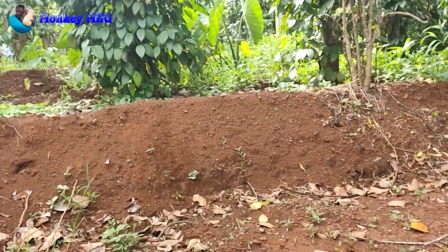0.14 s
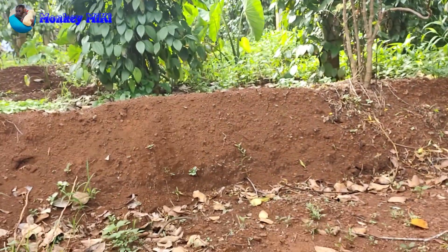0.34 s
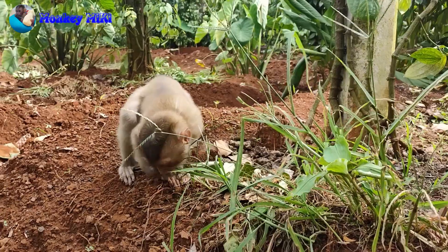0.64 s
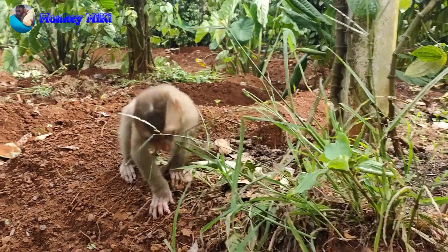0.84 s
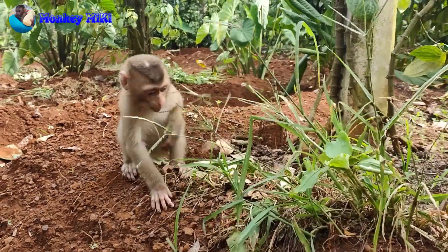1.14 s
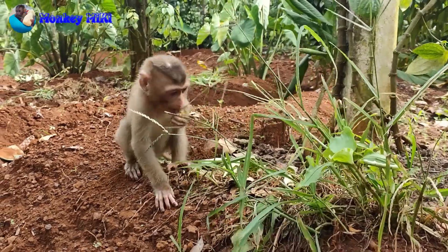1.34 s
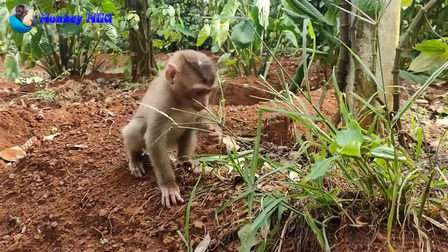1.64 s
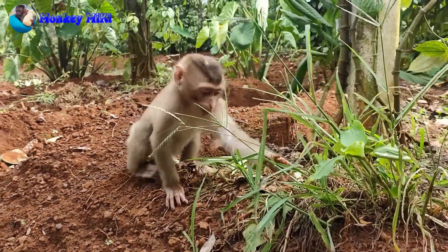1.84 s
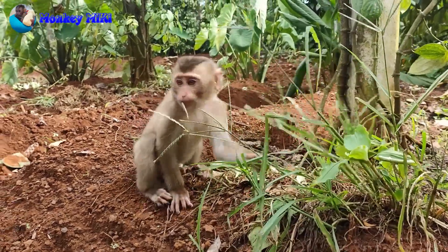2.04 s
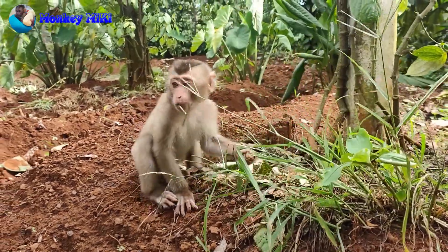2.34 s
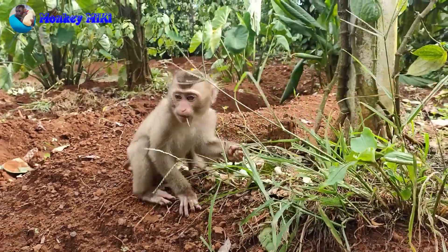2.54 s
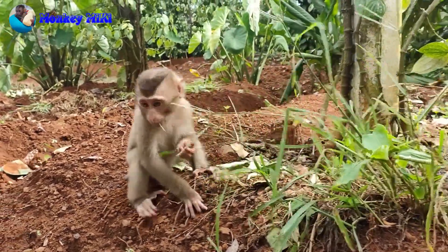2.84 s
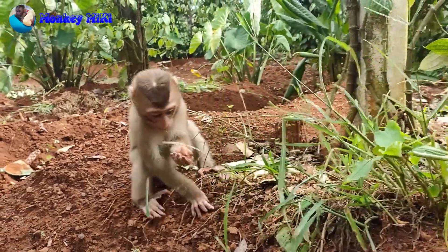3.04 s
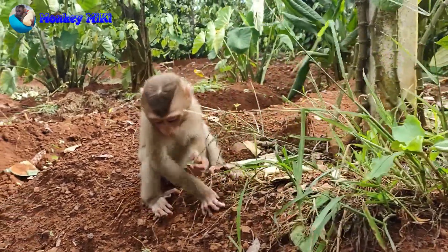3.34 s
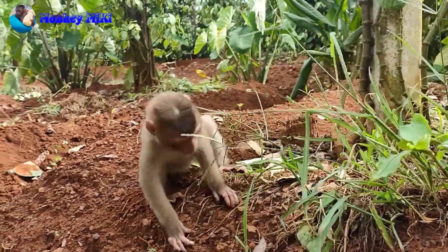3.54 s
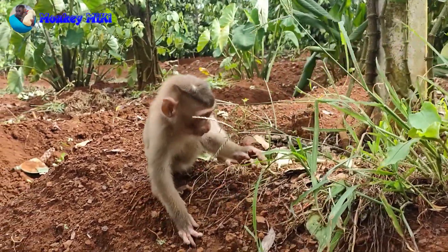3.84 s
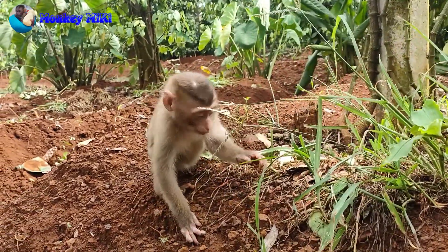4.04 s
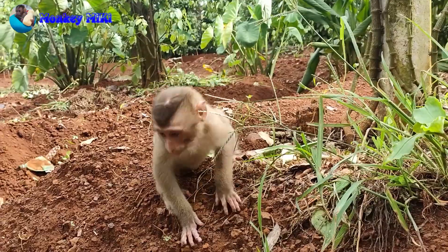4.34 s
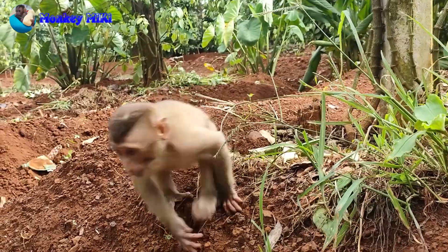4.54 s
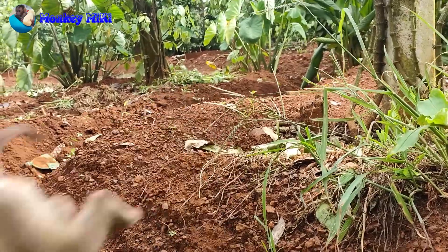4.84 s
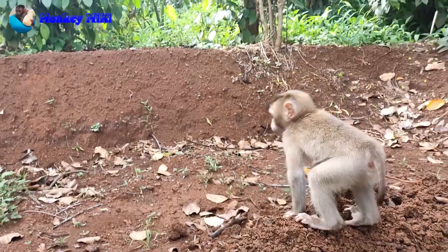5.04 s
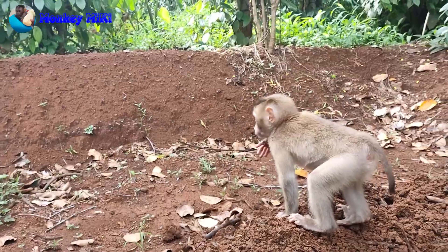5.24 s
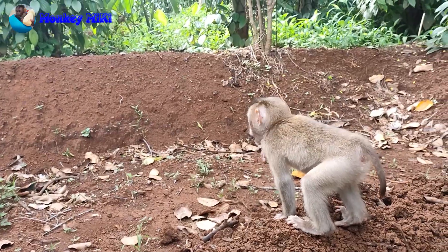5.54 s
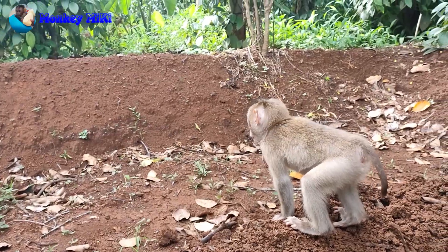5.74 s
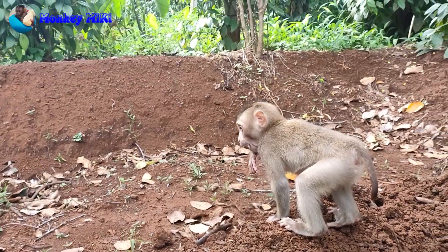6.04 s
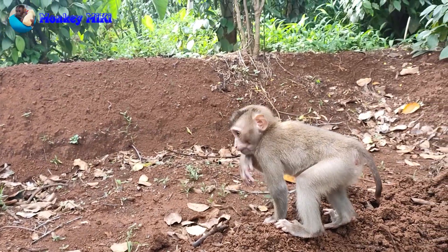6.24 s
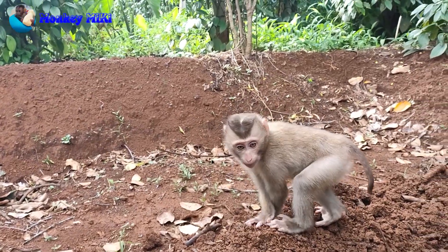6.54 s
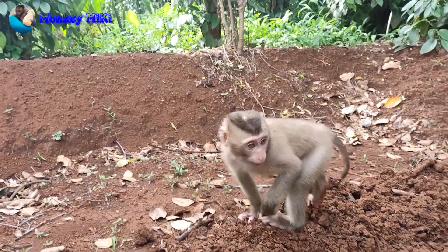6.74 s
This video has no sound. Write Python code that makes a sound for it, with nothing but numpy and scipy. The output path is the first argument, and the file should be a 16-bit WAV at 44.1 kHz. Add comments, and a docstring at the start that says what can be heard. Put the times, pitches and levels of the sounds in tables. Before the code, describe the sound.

Dry leaves rustle and loose soil crunches as a small animal scratches and digs outdoors, with sharp twig snaps over a faint low hum.

```python
"""Outdoors on loose soil: paws rustle dry leaves and snap twigs; a digging blade bites the earth and spills it.
Rustling is clumped grains of noise, snaps and ticks are short dying bursts, the blade rings in a few modes.
A bird peeps in wavering tones over shaped noise: a low rumble with a faint hum, and soft air hiss.
Two microphone ports a hand apart hear the near sounds with a small delay between them."""
import sys
import numpy as np
from scipy import signal
from scipy.fft import rfft, irfft
from scipy.io import wavfile
from scipy.ndimage import uniform_filter1d

SR = 44100
rng = np.random.default_rng(int(sys.argv[2]) if len(sys.argv) > 2 else 0)


def master(y):
    """Save y as 16-bit WAV."""
    cut = np.clip(np.atleast_2d(y).T, -1, 1)
    pcm = np.round(cut * 32767)  # scale
    wavfile.write(sys.argv[1], SR, pcm.astype(np.int16))


N = 303968  # length in samples

# the blade bites the soil: start t/s, rise/s, hold/s, fall/s (20 dB per rise or fall), crackle level/dB,
# body, thud and grit levels against the crackle/dB, ground thump/dB, left minus right/dB
BITES = [(1.873, 0.01, 0.025, 0.11, -43.5, -4, -15.5, -5, 0.5, -4.5),
         (2.473, 0.0059, 0.019, 0.27, -40, -8, -10, -1, 5, 2.5),
         (2.56, 0.0083, 0.022, 0.095, -34, -2.5, -39, -6, -2.5, 0.5),
         (3.176, 0.015, 0.083, 0.1, -46.5, -6.5, -11.5, -0.5, 1.5, 2),
         (3.855, 0.0017, 0.015, 0.13, -28.5, -5.5, -14.5, 0.5, 0.5, 0.5),
         (3.911, 0.0017, 0.026, 0.11, -31, -15.5, -17.5, -0.5, 4, -3.5),
         (4.56, 0.0059, 0.054, 0.087, -33.5, -10, -14.5, -4, 8, -1),
         (4.659, 0.0025, 0.032, 0.12, -38, -11.5, -19, -1.5, -4, -1.5),
         (5.63, 0.0077, 0.013, 0.096, -31.5, -7, -12.5, -1.5, 5.5, -0.3),
         (6.327, 0.0088, 0.097, 0.1, -47, -3, -4.5, -5.5, 6.5, -0.5)]
# leaves swish and soil spills: top reached t/s, rise/s, hold/s, fall/s (20 dB per rise or fall),
# crackle level/dB, body and grit levels against the crackle/dB, left minus right/dB
SWISHES = [(0.0, .01, 0.045, 0.13, -41.5, -5.5, -6, 2.5), (0.256, 0.6, 0.166, .002, -47, -6.5, -3.5, 0.5),
           (0.411, 0.034, 0.0066, 0.0028, -39, -7, -4, 1), (0.442, .006, 0.21, 0.13, -59, -12, -5.5, -2),
           (0.613, 0.11, .02, .04, -57.5, -5, -8, -6.5), (0.76, 0.086, 0.012, 0.078, -54, -8, -4.5, 2),
           (0.9, 0.072, 0.032, 0.54, -57, -8.5, -0.5, 3.5), (1.126, 0.0095, 0.013, 0.15, -54, -1.5, -10, 2),
           (1.318, .01, 0.22, 0.38, -63, -4.5, -5, -3.5), (2.277, 0.96, 0.018, 0.45, -59.5, -11, -2, 0.5),
           (2.783, 0.12, 0.1, 0.28, -53, -6.5, -4.5, 0.5), (3.004, .004, 0.021, .2, -52.5, -11, -4.5, -2),
           (3.315, .1, 0.033, 0.41, -51.5, -9.5, -4, 0), (3.533, .06, .005, 0.044, -56, -3, -4, -2),
           (4.194, 0.1, 0.0088, 0.15, -51.5, -4.5, -6.5, -2.5),
           (4.358, 0.17, 0.053, 0.95, -60.5, -8.5, 0, 0), (4.902, 0.19, 0.26, 0.2, -48.5, -5.5, -6.5, 0),
           (5.407, 0.048, 0.023, 0.26, -55, -4.5, -8, -0.5), (5.969, 0.3, 0.015, 0.26, -45.5, -5.5, -5, 0),
           (6.389, 0.03, 0.011, 0.043, -45, -6, -1.5, -2), (6.561, 0.29, 0.083, 0.095, -45, -6, -8, -0.5),
           (6.723, 0.12, 0.067, 0.35, -57, -3.5, -4.5, 0.5)]
# leaves that never quite rest: level/dB of crackle, body, thud, grit
STIR_DB = (-91, -69, -69.5, -71.5)
# tone colour of leaves and soil: f/Hz, relative level/dB per Hz
LEAF_COLOUR = [(250, 7), (460, -7.5), (920, -8.5), (1260, -14), (2200, -11.5), (3800, -10), (4900, -12.5),
               (5800, -5.5), (6500, -3.5), (7400, -7), (8700, -8), (10200, -11.5), (11400, -10),
               (13000, -8), (16000, -4.5)]
# how far narrow patches of the noise stand out: f/Hz, level/dB
PATCH_DEPTH = [(1000, 4), (4000, 4.5), (8000, 6.5), (14000, 6.5)]
# added leaf colour when heard from the other side: f/Hz, level/dB
FAR_SIDE_COLOUR = [(700, -3.5), (1400, -2.5), (2500, 1), (4000, -1.5), (5600, 2.5), (7500, 0.7),
                   (10000, 2.3), (13500, 4.5)]
# snaps of twigs and leaf ribs: t/s, burst peak level/dB, strongest f/Hz, low part against the burst/dB,
# time to fall 60 dB/s, left minus right/dB
SNAPS = [(0.0988, -30, 7650, -44, 0.012, -5), (0.158, -34, 3600, -23, 0.027, 3),
         (0.2263, -30.5, 7340, -19, 0.023, 5), (0.2848, -28, 6750, -25, 0.11, 5),
         (0.3554, -39.5, 4760, -8.5, 0.04, -5), (0.068, -41, 3560, -3, 0.04, 1),
         (0.315, -33, 7090, -19, 0.017, 11), (0.4498, -39.5, 5830, -16, 0.056, -5.5),
         (0.7565, -39.5, 2140, -6.5, 0.032, 6), (0.9102, -37, 8300, -16, 0.018, 2),
         (1.0256, -43, 622, -6.5, 0.085, -2), (1.127, -39.5, 4700, -4.5, 0.055, -5.5),
         (1.486, -45, 9040, -38, 0.04, -17), (1.605, -52, 2540, 8, 0.018, 1),
         (1.812, -43.5, 4000, -16, 0.031, -1), (2.294, -46, 6750, -28, 0.032, -10),
         (2.33, -48, 3660, -30, 0.026, -8), (2.5696, -16.5, 9000, -8, 0.028, 3),
         (2.598, -32, 6650, -41, 0.022, -5), (2.652, -29, 3740, -37, 0.022, -4),
         (2.8454, -39.5, 8150, -24, 0.058, 7), (3.194, -41, 3840, -16, 0.05, 4),
         (3.2373, -35, 7300, -22, 0.06, 11), (3.2513, -37.5, 5770, -0.5, 0.04, 2),
         (3.319, -37.5, 2730, -1, 0.066, 2), (3.3375, -36, 7000, -33, 0.075, 1),
         (3.3918, -45.5, 7350, -2, 0.074, 6), (3.9133, -22, 8600, -41, 0.06, 17),
         (3.9755, -31, 2400, -2.5, 0.05, -2), (4.5658, -21.5, 6370, -13.5, 0.072, 9),
         (4.6136, -26.5, 6540, -16, 0.045, -2), (4.669, -24, 10840, -15.5, 0.04, -1),
         (4.8004, -37.5, 4200, -22, 0.027, -2), (4.823, -40.5, 6900, -7.5, 0.0094, 21),
         (4.9346, -33.5, 7100, -15.5, 0.1, -2), (6.207, -46, 4800, -6.5, 0.12, 10),
         (6.3367, -34, 5670, -15, 0.098, -2)]
# thin ticks of brittle stems: t/s, peak level/dB, treble against the body/dB, left minus right/dB
TICKS = [(0.0494, -42, -10, 0), (0.052, -38, -10, 0), (0.093, -42, -10, 4), (0.105, -40, -13, 4),
         (0.132, -40, 8, 0), (0.282, -31, -12, 2), (0.412, -33, -13, -2), (0.416, -33, -6, -3),
         (1.828, -48, -6, 0), (1.871, -40, 5, 4), (0.122, -28.5, -13, 14), (0.2885, -29.5, -18, -21),
         (0.2935, -30, -17, -4), (0.91, -31, -2, 5), (1.0084, -35, 1, -4), (1.0224, -40, -3, -3),
         (1.0281, -40, 3, -5), (1.085, -42, -7, 1), (1.0927, -42, -1, -3), (1.136, -48, 7, 1),
         (1.174, -41, 3, -7), (1.183, -47, 8, -1), (1.192, -48, 7, -5), (1.278, -46, 6, -3),
         (1.3246, -15, -17, -3.5), (1.424, -29, -1, 4), (1.484, -37.5, 1.5, -12), (1.5329, -46, -1, -14),
         (1.546, -47, 0, -12), (1.5542, -43.5, -2, -20), (1.572, -46, -3, -16), (1.5816, -42, 3, -18),
         (1.632, -45, 7, -5), (1.659, -45, 7, -9), (2.476, -22, 5, 3), (2.5987, -21, 0.5, -7),
         (2.651, -34, -9, 4), (3.002, -39, -1, 13), (3.195, -41, -16, -4), (3.2385, -30, -2, 4),
         (3.342, -35, -8, 0), (3.394, -41, 2, 0), (2.57, -25, -8, -3), (3.9135, -26, 0, 8),
         (3.8556, -31, 10, 10), (4.571, -33, -5, 2), (4.669, -19, 8, -4)]
# knocks on the blade: t/s, level/dB, share of the high modes (0 to 1)
KNOCKS = [(2.495, -36.5, 0.2), (2.568, -37.5, 0.32), (2.791, -48, 0.62), (3.192, -40, 0.14),
          (3.392, -41.5, 0.62), (3.859, -34, 0.13), (3.98, -41, 0.22), (5.656, -31, 0.084),
          (6.335, -39.5, 0.15)]
# the blade's ringing modes: f/Hz, level/dB, time to fall 60 dB/s
BLADE_MODES = [(455, -2.5, 0.11), (933, 0, 0.13), (941, -7.5, 0.44), (1630, -9, 0.6), (2050, -5, 0.11),
               (3000, -18, 0.21)]
# bird calls: start t/s, rise/s, fall/s, top pitch f/Hz, level/dB, second partial against the first/dB,
# its pitch ratio, pitch sag at the ends (0 to 1)
PEEPS = [(0.453, 0.058, 0.089, 2940, -54.5, -6, .66, .05), (0.594, 0.051, 0.018, 2810, -67, 1, 0.69, 0.1),
         (0.752, 0.0069, 0.037, 2545, -57, -11, 1.7, 0.03)]
# tone colour of rumble and hiss: f/Hz, relative level/dB per Hz
AIR_COLOUR = [(15, -14.5), (28, -20), (45, -10), (70, -4.5), (110, -7), (170, -9), (230, -15.5), (320, -24),
              (390, -26), (1340, -33.5), (4560, -43), (6800, -33), (8500, -39.5), (11300, -45),
              (16000, -40)]
# how the low rumble comes and goes: t/s, relative level/dB
RUMBLE_MOVES = [(0, 1.5), (.42, 2.5), (.5, -1.5), (1.5, 2), (2.6, -0.5), (3.5, 2.5), (4.3, 0), (4.86, 2),
                (5.2, -3), (6.0, -1), (6.89, -1.5)]
# how alike the air sounds at both ports: f/Hz, likeness (0 to 1)
AIR_LIKENESS = [(100, .986), (250, .95), (700, .55), (1500, .1), (4000, 0)]
# blurred tones in the rumble: f/Hz, width/Hz, level above the rumble/dB
HUM_TONES = [(97, 13.6, 5), (149, 9.9, 2), (245.7, 5, 4.5), (299.9, 29, 12)]
# when the hum sounds: from t/s, to t/s
HUM_SPAN = (.45, 4.87)
# where the near sounds come from: from t/s, samples the left is late
LEFT_LAG = [(0, -1), (.435, 13), (.95, -3), (1.41, -16), (2.43, 12), (4.865, -12)]
# colour of the left port: f/Hz, level over the right/dB
PORT_COLOUR = [(300, -0.5), (1000, -2), (2400, -7), (4500, -4.5), (6500, -10), (7300, -11), (8000, 4),
               (10000, -3.5), (12000, 1), (13500, -14), (16000, 4)]

BODY_FADE, THUD_FADE, GRIT_FADE = 0.93, 1, 1.25  # how fast each layer dies, against the crackle
SWISH_THUD_DB = -16  # against the crackle
PATCH_CAP = 2.0  # soft upper limit for narrow patches
FAR_SIDE_S = 4.865  # from here the leaves are heard from the other side
THUMP_S = 0.061  # a thump swells and sinks in the rumble
PEEP_EDGE_DB = -11.5  # a peep sinks towards both ends
AIR_DB = -52.5  # level of rumble and hiss together
OFFSET = .0029  # small constant shift of the waveform
EDGE_HZ = 15900  # upper band limit


def gain_of(db):
    """Turns decibels into gain."""
    return 10 ** (np.asarray(db) / 20)


def evened(x):
    """Scales a signal to rms 1."""
    return x / np.sqrt(np.mean(x ** 2) + 1e-20)


def read(points, hz):
    """Reads a curve on a log-frequency axis."""
    f, value = np.transpose(points)
    return np.interp(np.log(hz + 1), np.log(f + 1), value)


def add(mix, s, sound):
    """Lays a sound into the mix at time s."""
    part = mix[:, round(s * SR):][:, :sound.shape[1]]
    part += sound[:, :part.shape[1]]


def sides(pan_db):
    """Gives left and right gains, one row each, for a level difference."""
    return gain_of([pan_db / 2, -pan_db / 2])[:, None]


def band(x, lo_hz, hi_hz):
    """Keeps only the pitches between two limits."""
    return signal.sosfilt(signal.butter(3, [lo_hz, hi_hz], "band", fs=SR, output="sos"), x)


def smooth_patches(values, across_pitch, across_time):
    """Blurs a noise field into soft patches of rms 1."""
    blurred = uniform_filter1d(values, across_pitch, axis=0)
    return evened(uniform_filter1d(blurred, across_time, axis=1))


def rustle(grains_per_s=9000, clump_db=0.63, same=0.31):
    """Clumped grains of leaf and soil; part of them reaches both ports alike, part only one."""
    clumps = evened(uniform_filter1d(rng.standard_normal(N), 400))
    starts = rng.random(N) < grains_per_s / SR
    size = signal.lfilter([1], [1, -.96], starts * gain_of(clump_db * clumps))  # fades within a few ms
    shared, left, right = rng.standard_normal((3, N)) * size
    # long waves reach both alike, so the separate parts keep less bass
    apart = np.sqrt(1 - same ** 2) * band(np.array([left, right]), 1620, 10560)
    hz, when, z = signal.stft(same * shared + apart, SR, nperseg=1024, noverlap=768)
    wide, narrow = rng.standard_normal((2, len(hz), len(when)))
    wide = smooth_patches(wide, 20, 7)  # leaves of varied size
    narrow = smooth_patches(narrow, 2, 9)  # narrow, brief patches of tone colour
    narrow_patches = np.minimum(narrow, PATCH_CAP * np.tanh(narrow / PATCH_CAP))
    colour_db = read(LEAF_COLOUR, hz)[:, None] + wide  # wide patches vary by 1 dB rms
    colour_db = colour_db + read(PATCH_DEPTH, hz)[:, None] * narrow_patches
    colour_db = colour_db + read(FAR_SIDE_COLOUR, hz)[:, None] * (when > FAR_SIDE_S)
    grains = signal.istft(z * gain_of(colour_db), SR, nperseg=1024, noverlap=768)[1][:, :N]
    crackle, body = evened(band(grains, 4600, 8500)), evened(band(grains, 1500, 4600))
    thud, grit = evened(band(grains, 390, 1500)), evened(band(grains, 8500, 17000))
    return (np.array(movement()) * [crackle, body, thud, grit]).sum(0)


def movement():
    """Gain of crackle, body, thud and grit at each port: the powers of all bites and swishes add."""
    t = np.arange(0, N + 16, 16) / SR
    power = gain_of(2 * np.array(STIR_DB))[:, None, None] * np.ones((len(STIR_DB), 2, len(t)))
    rows = [(s + rise, rise, hold, fall, db, body, thud, grit, pan)
            for s, rise, hold, fall, db, body, thud, grit, _, pan in BITES]
    rows += [(*times, db, body, SWISH_THUD_DB, grit, pan) for *times, db, body, grit, pan in SWISHES]
    for top, rise, hold, fall, db, body_db, thud_db, grit_db, pan_db in rows:
        layers = [(0, 1), (body_db, BODY_FADE), (thud_db, THUD_FADE), (grit_db, GRIT_FADE)]
        for k, (rel_db, fade) in enumerate(layers):
            level_db = db + rel_db + swell_db(t, top, rise, hold, fall / fade)
            power[k] += (sides(pan_db) * gain_of(level_db)) ** 2
    return [[np.interp(np.arange(N) / SR, t, np.sqrt(p)) for p in ports] for ports in power]


def swell_db(t, top, rise, hold, fall):
    """Rise, hold, fall: straight lines in dB, 20 dB in each rise or fall time."""
    before = (top - t) / max(rise, .001)
    after = (t - top - hold) / max(fall, .001)
    return -20 * np.maximum(np.maximum(before, after), 0)


def snaps(ring_share=0.56, width=0.099, same=0.87, after_db=-24, after_t60=0.28):
    """A dying burst around its own pitch with a low part; a faint, longer tail follows, like a ground echo."""
    out, t = np.zeros((2, N)), np.arange(4000) / SR
    for s, db, hz, low_db, t60, pan_db in SNAPS:
        shared, left, right = rng.standard_normal((3, len(t)))
        noise = same * shared + np.sqrt(1 - same ** 2) * np.array([left, right])
        # the ring wavers in pitch but is steady in strength
        phase = np.angle(signal.hilbert(band(noise, hz / (1 + width), hz * (1 + width))))
        ring = evened(np.cos(phase))
        broad = evened(band(noise, 2300, 14500) + 0.34 * band(noise, 13200, 20100))
        low = gain_of(low_db) * evened(band(noise, 330, 2100))
        fall = gain_of(-60 * t / max(t60, .004)) + gain_of(after_db - 60 * t / after_t60)
        fall *= np.minimum(t / (0.047 * t60), 1)  # longer snaps start softer
        burst = fall * (ring_share * ring + (1 - ring_share) * broad)
        snap = (burst + fall ** 1.11 * low) / abs(burst).max()  # the low part dies a little sooner
        add(out, s, sides(pan_db) * gain_of(db) * snap)
    return out


def ticks(t60=0.0073, body_hz=6800, low_hz=4300, break_size=4.8):
    """A stem breaks at once: an impulse with brief splinters, the same at both ports but for level."""
    out, t = np.zeros((2, N)), np.arange(600) / SR
    fall = gain_of(-60 * t / t60) + gain_of(-9 - 60 * t / 0.022)
    for s, db, treble_db, pan_db in TICKS:
        crack = (rng.standard_normal(len(t)) + break_size * (t == 0)) * fall
        body = band(crack, body_hz / 1.085, body_hz * 1.184)
        body += 0.41 * band(crack, low_hz / 1.6, low_hz * 1.8)
        body += 0.13 * band(crack, 700, 3700)
        treble = gain_of(treble_db) * evened(band(crack, 7000, 17800))
        tick = evened(body) + treble
        add(out, s, sides(pan_db) * gain_of(db) * tick / abs(tick).max())
    return out


def blade():
    """Knocked steel rings in a few dying modes; each knock sets the balance of low and high ones."""
    out, t = np.zeros((2, N)), np.arange(20000) / SR
    for s, db, high in KNOCKS:
        shares = [1 - high] + [high] * (len(BLADE_MODES) - 1)
        ring = np.zeros(len(t))
        for share, (hz, mode_db, t60) in zip(shares, BLADE_MODES):
            ring += share * gain_of(db + mode_db - 60 * t / t60) * np.sin(2 * np.pi * hz * t)
        add(out, s, sides(-0.93) * ring * np.minimum(t / 0.0061, 1))  # soft start of 6.1 ms
    return out


def bird():
    """Thin peeps wavering in pitch and strength, each with a second partial."""
    out = np.zeros((2, N))
    for s, rise, fall, top_hz, db, second_db, ratio, sag in PEEPS:
        t = np.arange(0, rise + fall, 1 / SR)
        away = np.maximum(1 - t / rise, (t - rise) / fall)  # 0 at the top, 1 at both ends
        flutter = evened(uniform_filter1d(rng.standard_normal(8000), 250))[:len(t)]
        pitch_hz = top_hz * (1 - sag * away ** 1.8 + 0.0064 * flutter)
        phase = 2 * np.pi * np.cumsum(pitch_hz) / SR
        tone = np.sin(phase) + gain_of(second_db) * np.sin(phase * ratio)
        level = gain_of(db + PEEP_EDGE_DB * away + 2.7 * flutter) * signal.windows.tukey(len(t), .2)
        add(out, s, np.ones((2, 1)) * np.sqrt(2) * level * tone)
    return out


def air():
    """Low rumble of the distance, nearly mono, with a faint hum, under a soft wide hiss."""
    frames, hz = N // 512 + 5, np.fft.rfftfreq(4096, 1 / SR)
    t = (np.arange(frames) * 512 - 2048) / SR
    a, b, c, d, patches = rng.standard_normal((frames, 2049, 5)).T
    patches_db = smooth_patches(patches, 30, 8)
    thumps_db = sum(row[-2] * np.exp(-((t - row[0] - THUMP_S / 2) / THUMP_S) ** 2) for row in BITES)
    moves_db = np.interp(t, *np.transpose(RUMBLE_MOVES)) + thumps_db
    low_db = moves_db / (1 + (hz[:, None] / 300) ** 2)  # fades out above some 300 Hz
    hum_db = sum(db / (1 + (2 * (hz - f) / width) ** 2) for f, width, db in HUM_TONES)
    hum_db = hum_db[:, None] * ((t > HUM_SPAN[0]) & (t < HUM_SPAN[1]))
    same = np.clip(read(AIR_LIKENESS, hz), -1, 1)[:, None]
    left, other = a + 1j * b, c + 1j * d
    z = np.array([left, same * left + np.sqrt(1 - same ** 2) * other])
    z *= gain_of(read(AIR_COLOUR, hz)[:, None] + patches_db + low_db + hum_db)
    noise = signal.istft(z, nperseg=4096, noverlap=3584, boundary=False)[1]
    return gain_of(AIR_DB) * evened(noise[:, 2048:N + 2048])


def scene():
    """Near sounds reach one port a few samples before the other; the air lies beneath."""
    left, right = rustle() + snaps() + ticks() + blade() + bird()
    since, samples = np.transpose(LEFT_LAG)
    late = samples[np.searchsorted(since, np.arange(N) / SR, "right") - 1].astype(int)
    left = left[np.clip(np.arange(N) - late, 0, N - 1)]
    return np.array([left, right]) + air()


def record(dry):
    """The two ports differ in colour; then the band limit and a small constant offset."""
    tilt_db = read(PORT_COLOUR, np.fft.rfftfreq(N, 1 / SR))
    coloured = irfft(rfft(dry) * gain_of([tilt_db / 2, -tilt_db / 2]), N)
    edge = signal.firwin(511, EDGE_HZ, window=("kaiser", 9), fs=SR)
    return signal.oaconvolve(coloured, edge[None], "same") + OFFSET


dry = scene()
out = record(dry)
master(out)
```